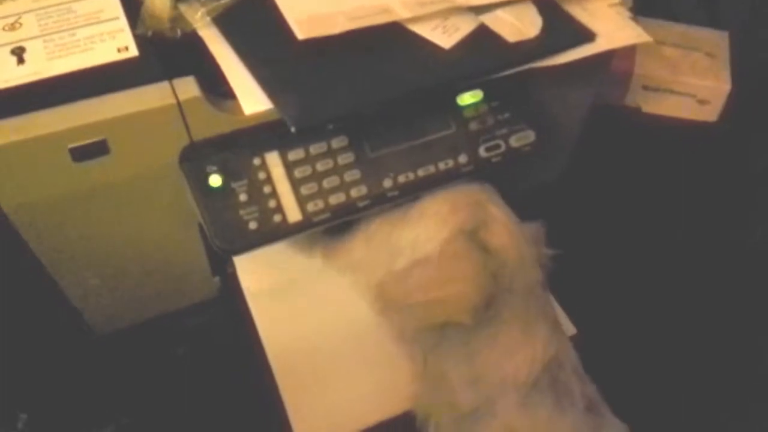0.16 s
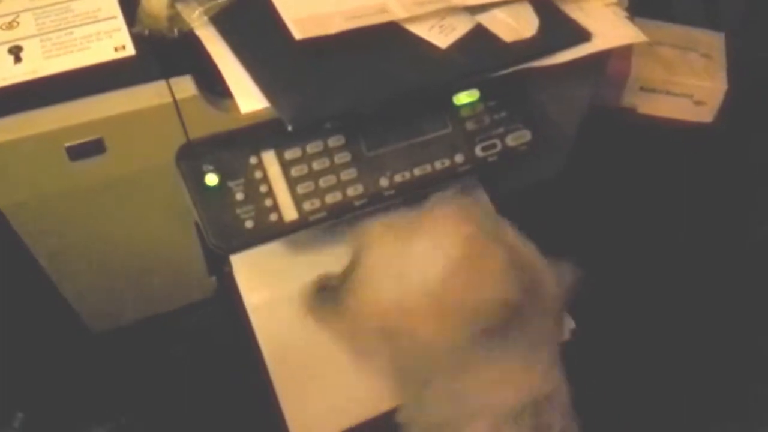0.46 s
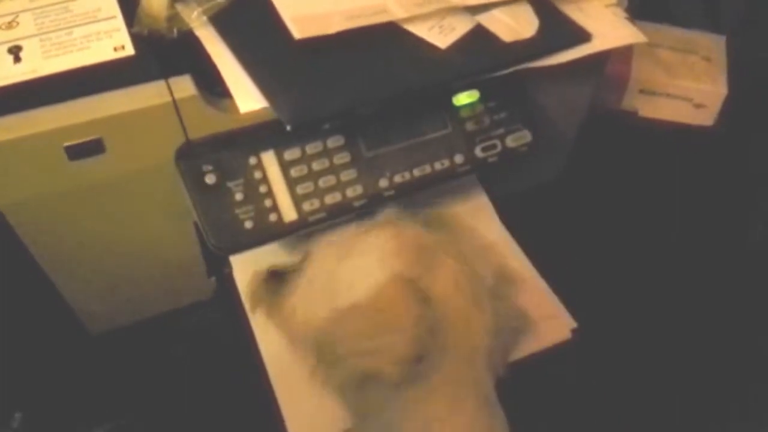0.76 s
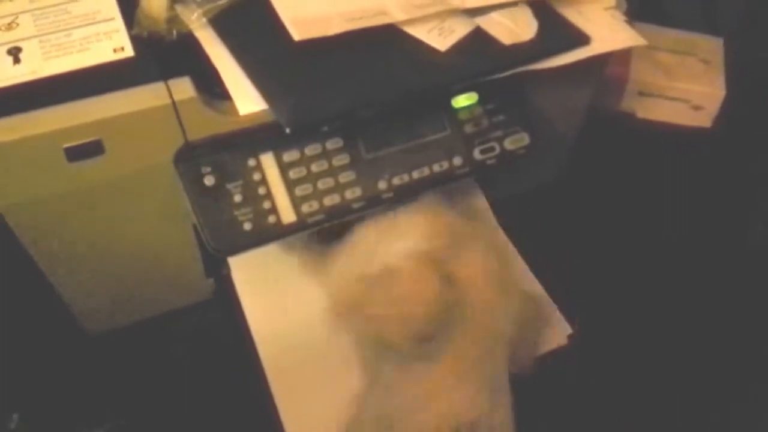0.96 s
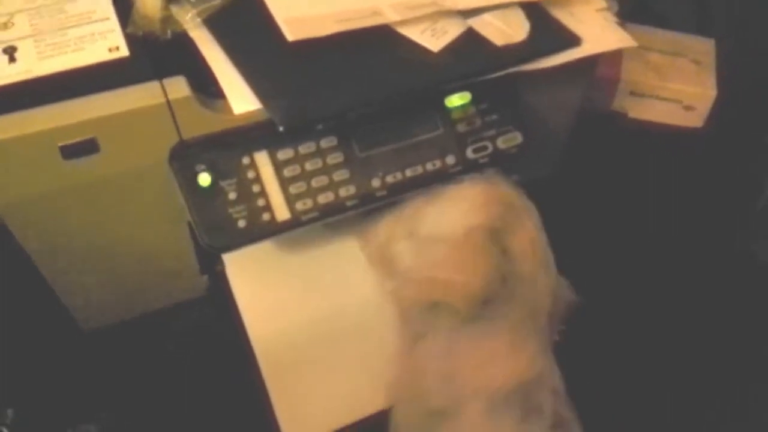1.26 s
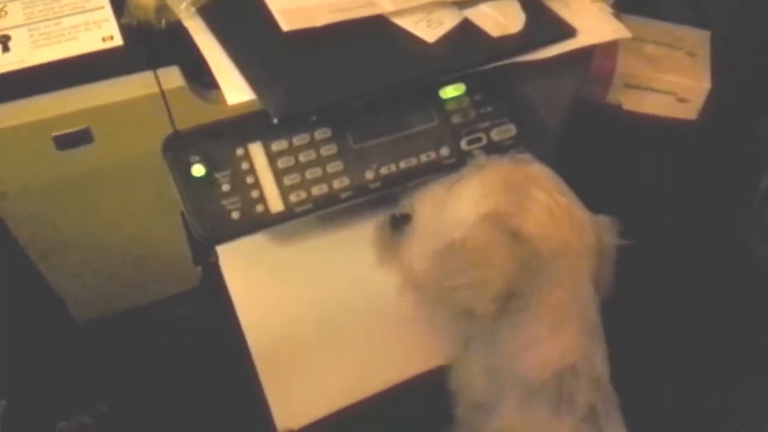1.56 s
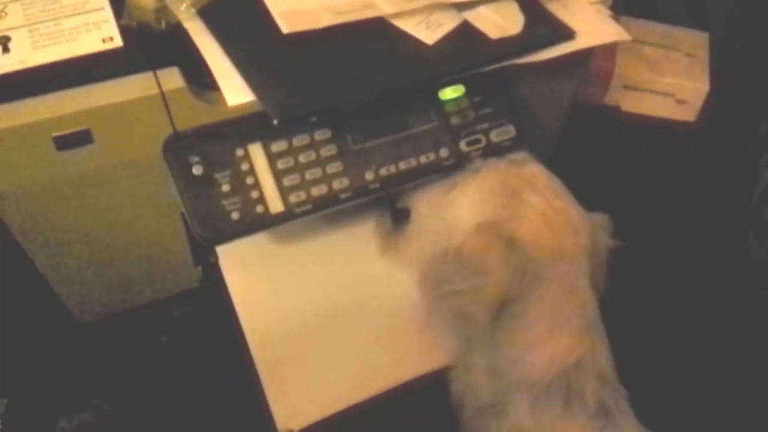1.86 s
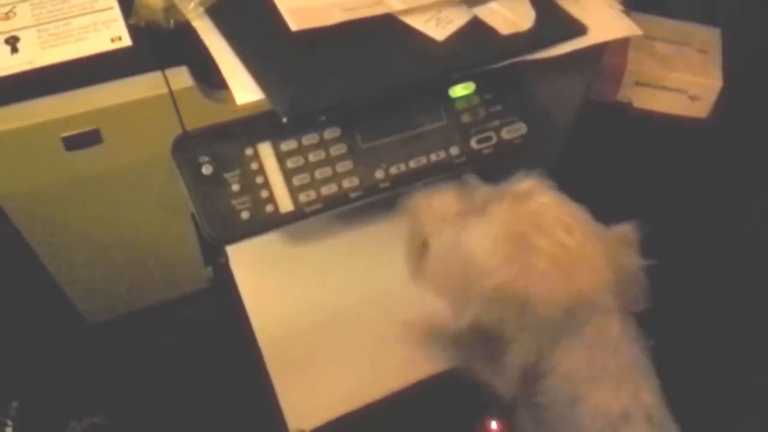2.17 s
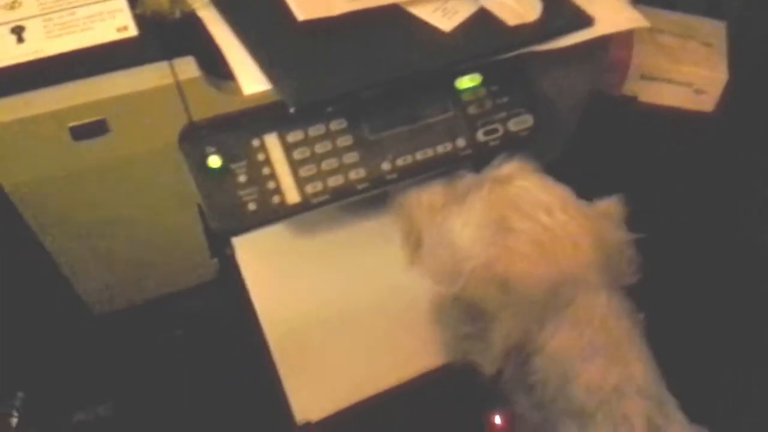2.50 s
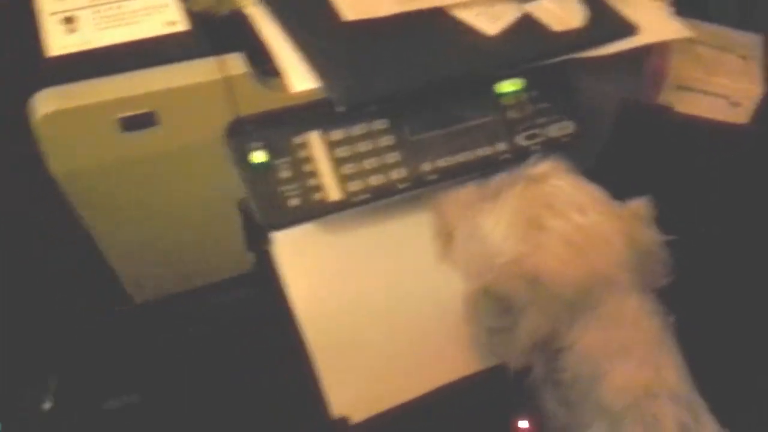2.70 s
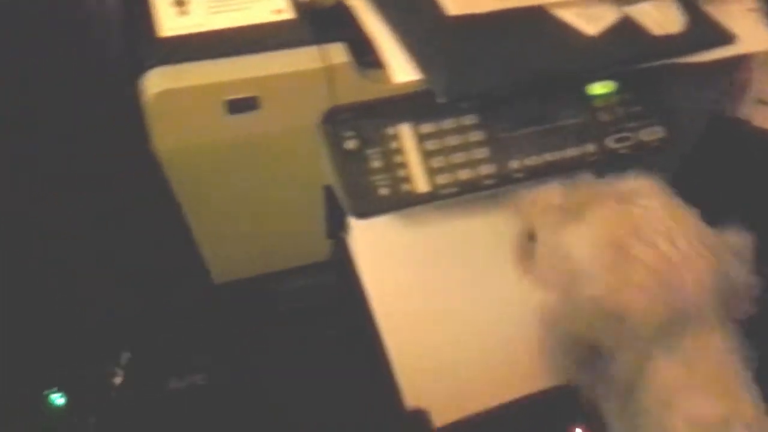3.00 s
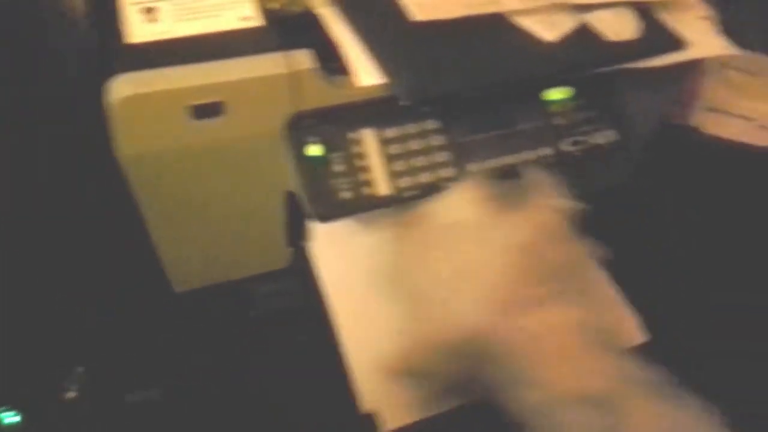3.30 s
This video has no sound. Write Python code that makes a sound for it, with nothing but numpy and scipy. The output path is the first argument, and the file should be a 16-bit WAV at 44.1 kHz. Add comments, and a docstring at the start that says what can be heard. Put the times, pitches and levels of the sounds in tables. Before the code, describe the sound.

A small dog barks hoarsely in quick runs, with short squeaky whines, in a room.

```python
"""A small dog, close by in a furnished room, gives two squeaky whines and five hoarse barks. Its lips smack,
a growl opens into a lone bark, and a paw lands. After a faint whine, another growl opens two last barks.
Each bark is a source and a filter: rough vocal-fold pulses on a pitch arc excite the throat's resonances.
Throughout, breath hisses through nose and teeth, the walls reverberate, and the loud barks slightly
overload a two-port microphone."""
import sys
import numpy as np
from scipy import signal
from scipy.fft import rfft, irfft, next_fast_len
from scipy.io import wavfile
from scipy.ndimage import uniform_filter1d, map_coordinates

SR = 44100
rng = np.random.default_rng(int(sys.argv[2]) if len(sys.argv) > 2 else 0)


def inscribe(sig):
    """Save sig as 16-bit PCM at rate SR to the path in sys.argv[1].

    A 1-D sig is mono; a 2-D sig holds one channel per row.
    Samples are clipped to [-1, 1] before scaling.
    """
    pcm = np.round(np.clip(np.atleast_2d(sig).T, -1, 1) * 32767)
    wavfile.write(sys.argv[1], SR, pcm.astype(np.int16))


N = 152145

# Levels are relative, ahead of the mix.
# Noise spectra of the room, breath, a faint high hiss and air on the ports: frequency_hz, density_db
ROOM_SPECTRUM = [(24, -48), (40, -17), (138, -1), (477, -7.5), (554, -6.5), (865, -5.5), (1320, -10),
                 (1490, -12), (1960, -18.5), (2390, -14.5), (3140, -20), (8250, -20.5), (15000, -52)]
BREATH_SPECTRUM = [(880, -51), (1500, -12), (2020, -6), (2830, -6.5), (4040, -9.5), (5200, -7.5),
                   (6500, -2.5), (7600, 3.5), (9000, -7), (10300, -15), (11000, -42.5), (15000, -66)]
HIGH_HISS_SPECTRUM = [(9000, -42.5), (10500, 3.5), (12500, 3), (14300, -5.5), (15100, -26)]
PUFF_SPECTRUM = [(20, -37), (60, -18), (110, -11), (200, -11.5), (330, -7.5), (500, -49.5)]
# Likeness of left and right: frequency_hz, correlation
ROOM_COHERENCE = [(60, 0.29), (240, 0.95), (930, 0.27), (3680, -0.17), (14500, -0.05)]
HISS_COHERENCE = [(2000, .3), (7000, 0)]
# Reverberation time: frequency_hz, t60_s
ROOM_DECAY = [(300, .35), (600, 0.29), (900, 0.28), (2000, 0.32), (5000, 0.29), (10000, 0.16)]
# Imbalance of the ports: frequency_hz, left_over_right_db
PORT_BALANCE = [(60, -4.0), (130, -2.5), (290, -0.5), (630, 2.5), (1380, -6.5), (3020, -0.5), (6620, -3),
                (14500, -6)]
# Envelopes of the breath, the faint high hiss and the landing paw: time_s, level_db
BREATH_LEVEL = [(0.0, -40.5), (0.04, -33), (0.13, -52.5), (0.18, -52.5), (0.21, -33), (0.23, -37.5),
                (0.28, -19.5), (0.29, -24.5), (0.32, -34), (0.36, -25), (0.45, -31.5), (0.49, -37),
                (0.62, -25.5), (0.72, -40), (0.76, -42.5), (0.8, -28), (0.88, -26), (0.95, -41),
                (0.97, -30.5), (0.98, -41.5), (1.01, -36.5), (1.04, -32.5), (1.08, -30), (1.1, -31),
                (1.15, -29.5), (1.3, -47), (1.36, -30.5), (1.46, -29), (1.54, -38), (1.58, -48),
                (1.61, -36), (1.7, -55), (1.82, -68), (1.85, -50.5), (1.92, -60), (1.95, -35),
                (1.97, -43.5), (1.99, -28), (2.01, -24), (2.03, -30), (2.13, -24.5), (2.26, -31.5),
                (2.32, -50.5), (2.4, -68.5), (2.65, -52), (2.77, -59), (2.82, -53), (2.88, -61.5),
                (3.01, -51), (3.04, -31), (3.05, -28), (3.15, -21), (3.18, -33.5), (3.23, -38.5),
                (3.35, -29), (3.45, -42)]
HIGH_HISS_LEVEL = [(0.0, -55), (0.09, -53), (0.13, -79), (0.28, -40), (0.32, -53), (0.55, -58), (0.8, -90),
                   (0.83, -61), (0.89, -95), (0.93, -114), (0.96, -54), (1.0, -69), (1.03, -54.5),
                   (1.27, -88), (1.3, -61), (1.46, -61), (1.78, -104), (1.99, -55), (2.27, -58.5),
                   (2.36, -100), (2.68, -74), (2.98, -74), (3.05, -48), (3.36, -67), (3.41, -84),
                   (3.45, -59)]
PAW_LEVEL = [(2.22, -57.5), (2.26, -38.5), (2.3, -51)]
# Lip and tongue clicks: start_s, level_db, crack_over_knock_db
SMACKS = [(0.962, -27, 11), (1.941, -19, -11.5), (1.95, -18.5, -3.5)]
# One contour per whine: time_s, pitch_hz, level_db
WHINE_CONTOURS = [
    [(0, 725, -30), (.012, 1133, -26), (.025, 1182, -23.5), (.045, 1222, -24.5), (.058, 1277, -26),
     (.072, 1240, -18.5), (.082, 1000, -26.5), (.092, 825, -37.5), (.1, 750, -56)],
    [(.194, 724, -29.5), (.2, 960, -32), (.21, 1130, -20), (.228, 1064, -23), (.245, 1128, -20),
     (.258, 1180, -28), (.268, 1045, -28.5), (.278, 898, -26), (.288, 817, -18)],
    [(2.784, 695, -61), (2.795, 833, -58), (2.81, 834, -58), (2.85, 838, -63), (2.875, 810, -64),
     (2.895, 778, -62), (2.91, 680, -67), (2.97, 657, -66)],
]
# One row per whine: level_db of each harmonic, from the fundamental up
WHINE_HARMONICS = [
    [-0.5, -10, -13, -12.5, -20, -37, -44],
    [-0.5, -12, -18.5, -11, -30, -28.5, -31.5],
    [9.5, -25, -12, 4, -25, -25, -25, -3],
]
# Growled onsets: start_s, length_s, first_pitch_hz, last_pitch_hz, level_db
GROWLS = [(2.016, .055, 244, 405.6, -9.5), (3.012, .055, 244.8, 417, -8)]
# A lingering low ring near 295 Hz, then formants of throat, nose and mouth: centre_hz, width_hz, gain_db
RESONANCES = [(295, 40, -21), (625, 350, -6.5), (861.5, 53, 7.5), (1069, 109, -4), (1592, 161, -2.5),
              (2123, 317, -12), (2730, 540, -16.5), (4950, 370, -35.5)]
# One effort envelope per bark: time_s, level_db
BARK_EFFORTS = [
    [(0.28, -39.5), (0.29, -10.5), (0.324, -14), (0.356, -6.5), (0.51, -16), (0.52, -11)],
    [(0.52, -15.5), (0.538, -11.5), (0.566, -9), (0.636, -6.5), (0.698, -28.5), (0.72, -23)],
    [(0.74, -42), (0.76, -14.5), (0.828, -7), (0.898, -11.5), (0.914, -37), (0.95, -15)],
    [(1.0, -16), (1.004, -22), (1.128, -6.5), (1.158, -9.5), (1.244, -34.5), (1.25, -10.5)],
    [(1.31, -15.5), (1.314, -22.5), (1.398, -7), (1.51, -18.5), (1.53, -58.5)],
    [(2.02, -28.5), (2.042, -17.5), (2.1, -7.5), (2.156, -10.5), (2.21, -33.5)],
    [(3.015, -36.5), (3.027, -18.5), (3.051, -12), (3.107, -5), (3.143, -9), (3.21, -22.5)],
    [(3.24, -17), (3.304, -5.5), (3.36, -8), (3.45, -27)],
]
# One row per bark: top_s, top_pitch_hz, tone_db, noise_share, nose_db, mouth_db, bite_db
BARK_VOICES = [(0.388, 593.2, -5, 0.48, 0, 0.5, 0), (.59, 574, -7, 0.26, -0.5, 1.5, 0.5),
               (0.844, 604, -3.5, 0.77, -1, 1.5, 3), (1.14, 584.7, -4, 0.75, -1, -4, -1.5),
               (1.41, 587.7, -3, 0.83, -1.5, -4, 1), (2.13, 624.3, 0, 0.7, -4.5, 1.5, -0.5),
               (3.12, 639.9, -2, 0.8, -5.5, 3.5, 0.5), (3.32, 599.3, -2, 0.77, -2, 2.5, 0.5)]

ROOM_DB, ROOM_SWAY_DB = -53, .6
RASP_ECHO_DB, TONE_ECHO_DB = -2.5, -13
SHARED_ECHO, SHARED_BELOW_HZ = .5, 900  # the ports share part of the low echoes
PUFF_DB, PUFF_EXPONENT = -22.5, 1.63
WHINE_WAVER, WHINE_FLUTTER_DB, OVERTONE_FADE = .006, 2.2, .7
JITTER_CYCLES, SHIMMER_DB, ALTERNATE_DIP = .11, 3.5, .24
RASP_LOW_HZ, RASP_HIGH_HZ = 450, 6000
SAG_HZ_PER_S2, LOWEST_PITCH_HZ, TONE_FADE_DB_PER_HZ = 27000, 440, .05
BARK_WAVER, BARK_FLUTTER_DB = .022, 3.2
CLOSED_MOUTH_HZ, OPENING_EXPONENT = 1260, .61
LEFT_LAG_S, CEILING, KNEE, BASS_CUT_HZ, BAND_LIMIT_HZ = .00002, 1.02, 3.5, 88, 15100


def amp(db):
    return 10 ** (np.asarray(db) / 20)


def unit_rms(x):
    return x / np.sqrt(np.mean(x ** 2) + 1e-20)


def along(points, hz):
    """Interpolation of (frequency_hz, value) points on a logarithmic axis."""
    frequencies, values = np.transpose(points)
    return np.interp(np.log(hz + 1), np.log(frequencies + 1), values)


def envelope(rows, edge_s):
    """Gain interpolated in decibels, fading out just beyond both ends."""
    s, db = np.transpose(rows)
    t = np.arange(N) / SR
    return amp(np.interp(t, s, db)) * np.clip(1 + np.minimum(t - s[0], s[-1] - t) / edge_s, 0, 1)


def filtered(x, response):
    """Linear filtering: the spectrum times a frequency response."""
    size = next_fast_len(N + SR // 2)
    return irfft(rfft(x, size) * response(np.fft.rfftfreq(size, 1 / SR)), size)[..., :N]


def wobble(rate_hz):
    """Smooth random modulation: a spline through random knots."""
    knots = rng.standard_normal(int(N * rate_hz / SR) + 4)
    return map_coordinates(knots, [np.arange(N) * rate_hz / SR])


def stereo_noise(spectrum, coherence, patchy_db):
    """Partly coherent noise, patchy in time and frequency: the mid-to-side ratio sets the correlation."""
    bins = signal.stft(rng.standard_normal((2, N)), nperseg=512)[2]
    patches = uniform_filter1d(uniform_filter1d(rng.standard_normal(bins.shape[1:]), 6, 0), 6, 1)
    pair = signal.istft(bins * amp(patchy_db * unit_rms(patches)), nperseg=512)[1][:, :N]
    angle = lambda hz: np.arccos(np.clip(along(coherence, hz), -1, 1)) / 2
    mid, side = filtered(pair, lambda hz: amp(along(spectrum, hz)) * [np.cos(angle(hz)), np.sin(angle(hz))])
    return unit_rms(np.array([mid + side, mid - side]))


def room_tone():
    """Ambient noise: a broad spectrum under slight amplitude modulation."""
    level = amp(ROOM_DB + ROOM_SWAY_DB * wobble(16))
    return level * stereo_noise(ROOM_SPECTRUM, ROOM_COHERENCE, patchy_db=.8)


def high_hiss():
    """Band-limited noise: a faint high hiss that comes and goes, brightest on the sniffs."""
    return envelope(HIGH_HISS_LEVEL, .01) * stereo_noise(HIGH_HISS_SPECTRUM, HISS_COHERENCE, patchy_db=5.5)


def reverberation(voice):
    """Diffuse reflections decay exponentially; their fine pattern shifts as the dog moves its head."""
    out, t = 0, np.arange(N) / SR
    for centre_s in np.arange(8) / 2:
        hz, age_s, bins = signal.stft(rng.standard_normal((2, SR // 2)), SR, nperseg=256)
        bins = bins + SHARED_ECHO * bins[::-1] * np.exp(-hz / SHARED_BELOW_HZ)[:, None]
        decay = amp(-60 * age_s / along(ROOM_DECAY, hz)[:, None])
        tail = signal.istft(bins * decay, SR, nperseg=256)[1]
        crossfade = np.clip(1 - abs(t - centre_s) * 2, 0, 1)
        delayed = np.pad(voice * crossfade, (200, 0))
        out = out + signal.fftconvolve(delayed[None], tail / np.linalg.norm(tail[0]), axes=1)[:, :N]
    return out


def puffs_and_paw():
    """Low noise: airflow buffets the ports, growing faster than bark effort, and a paw's impact thuds."""
    effort = sum(envelope(rows, .015) for rows in BARK_EFFORTS)
    level = amp(PUFF_DB) * effort ** PUFF_EXPONENT + envelope(PAW_LEVEL, .0079)
    return level * stereo_noise(PUFF_SPECTRUM, coherence=[(100, .13)], patchy_db=4)


def breath():
    """Turbulence at nose and teeth makes a fluttering hiss."""
    level = envelope(BREATH_LEVEL, .01) * amp(wobble(70))
    return level * stereo_noise(BREATH_SPECTRUM, HISS_COHERENCE, patchy_db=3.5)


def smacks(knock_hz=1100, t60_s=.011):
    """Damped oscillation: lips and tongue give a hollow knock with a bright crack."""
    out, t = np.zeros(N + SR), np.arange(SR // 10) / SR
    knock = np.sin(2 * np.pi * knock_hz * t)
    for start_s, db, crack_db in SMACKS:
        crack = amp(crack_db) * uniform_filter1d(np.diff(rng.standard_normal(len(t) + 1)), size=3)
        out[round(start_s * SR):][:len(t)] += amp(db - 60 * t / t60_s) * (knock + crack)
    return out[:N]


def whine(contour, harmonics_db):
    """Nearly periodic vibration gives a harmonic series; overtones fade faster than the fundamental."""
    s, hz, db = np.transpose(contour)
    t = np.arange(N) / SR
    cycles = np.cumsum(np.interp(t, s, hz) * (1 + WHINE_WAVER * wobble(80))) / SR
    fade_db = OVERTONE_FADE * (np.interp(t, s, db) - db.max())
    tone = 0
    for k, harmonic_db in enumerate(harmonics_db, 1):
        level = amp(harmonic_db + WHINE_FLUTTER_DB * wobble(100) + (k > 1) * fade_db)
        tone = tone + level * np.sin(2 * np.pi * k * cycles)
    return np.sqrt(2) * tone * envelope(np.transpose([s, db]), .0052)


def growls():
    """Pitch rises with tension: a partly inharmonic buzz glides up as the folds tighten."""
    t, out = np.arange(N) / SR, 0
    for start_s, length_s, first_hz, last_hz, db in GROWLS:
        end_s = start_s + length_s
        cycles = np.cumsum(np.interp(t, [start_s, end_s], [first_hz, last_hz])) / SR
        partials = zip((.77, 2, 3, 4.5), (.045, .7, .38, .12))
        buzz = sum(level * np.cos(2 * np.pi * ratio * cycles) for ratio, level in partials)
        out = out + buzz * envelope([(start_s, db - 17), (start_s + length_s / 2, db), (end_s, db)], .0032)
    return out


def vocal_folds(cycles, noise_share):
    """Hoarse phonation: pulses with jitter and shimmer, every second one weaker, plus pulsating noise."""
    noise = rng.standard_normal(N) * (1 + .48 * np.cos(2 * np.pi * cycles))
    onsets = np.flatnonzero(np.diff(np.floor(cycles)) > 0)
    jitter, shimmer = rng.standard_normal((N, 2))[:len(onsets)].T
    moved = np.clip(onsets + JITTER_CYCLES * np.gradient(onsets) * jitter, 0, N - 1).astype(int)
    sizes = amp(SHIMMER_DB * shimmer) * (1 - ALTERNATE_DIP * (np.arange(len(onsets)) % 2))
    pulses = np.bincount(moved, sizes, N)
    return np.sqrt(1 - noise_share) * unit_rms(pulses) + np.sqrt(noise_share) * unit_rms(noise)


def vocal_tract(hz, nose_db, mouth_db, bite_db):
    """Parallel resonators: the formants, some varying from bark to bark, with a low ring beside them."""
    boost_db = {2: nose_db, 4: mouth_db, 5: bite_db, 6: bite_db}
    modes = []
    for k, (centre_hz, width_hz, db) in enumerate(RESONANCES):
        resonance = 1j * hz * width_hz / (centre_hz ** 2 - hz ** 2 + 1j * hz * width_hz)
        modes.append((-1) ** k * amp(db + boost_db.get(k, 0)) * resonance)
    low_ring, *formants = modes
    u = 1j * hz / RASP_LOW_HZ
    highpass = u * u / (1 + np.sqrt(2) * u + u * u)
    lowpass = 1 / (1 + 1j * hz / RASP_HIGH_HZ)
    return low_ring + sum(formants) * (highpass * lowpass) ** 2


def barks():
    """Source and filter: the folds drive the tract into a rasp, beside a clear tone on the pitch arc."""
    t, tones, rasp = np.arange(N) / SR, 0, 0
    for rows, (top_s, top_hz, tone_db, noise_share, *boosts_db) in zip(BARK_EFFORTS, BARK_VOICES):
        sag_hz = SAG_HZ_PER_S2 * (t - top_s) ** 2
        pitch_hz = np.maximum(top_hz - sag_hz, LOWEST_PITCH_HZ) * (1 + BARK_WAVER * wobble(110))
        cycles = np.cumsum(pitch_hz) / SR
        folds = vocal_folds(cycles, noise_share)
        effort = envelope(rows, .017)
        tone_level = amp(tone_db - TONE_FADE_DB_PER_HZ * sag_hz + BARK_FLUTTER_DB * wobble(80))
        tones = tones + effort * tone_level * np.sin(2 * np.pi * cycles)
        # The mouth opens with effort and lets the upper resonances out.
        opening = (effort / effort.max()) ** OPENING_EXPONENT
        muffled = filtered(folds, lambda hz: 1 / (1 + (hz / CLOSED_MOUTH_HZ) ** 4))
        source = effort * (muffled + opening * (folds - muffled))
        tract = lambda hz: vocal_tract(hz, *boosts_db)
        rasp = rasp + filtered(source, tract) / np.std(filtered(folds, tract))
    return tones, rasp


def scene():
    """Superposition: dog and echo reach the two ports with level and time differences, over room tone."""
    tones, rasp = barks()
    tones = tones + growls() + sum(map(whine, WHINE_CONTOURS, WHINE_HARMONICS))
    echo = reverberation(amp(RASP_ECHO_DB) * rasp + amp(TONE_ECHO_DB) * tones)
    hiss = breath() + high_hiss()
    direct = amp(3) * hiss + amp(-3.5) * (tones + smacks()) + amp(-4) * rasp + puffs_and_paw()
    side = np.array([[.5], [-.5]])
    ports = lambda hz: amp(side * along(PORT_BALANCE, hz)) * np.exp(-2j * np.pi * hz * LEFT_LAG_S * side)
    return filtered(direct + echo, ports) + room_tone()


def record(dry):
    """Nonlinear distortion: the microphone saturates asymmetrically, then cuts bass and extreme treble."""
    asymmetry = np.array([[.004], [.008]])  # left, right
    bent = dry + asymmetry * dry ** 2
    saturated = bent / (1 + abs(bent / CEILING) ** KNEE) ** (1 / KNEE)
    return filtered(saturated, lambda hz: (hz < BAND_LIMIT_HZ) * 1j * hz / (BASS_CUT_HZ + 1j * hz))


dry = scene()
out = record(dry)
inscribe(out)
```